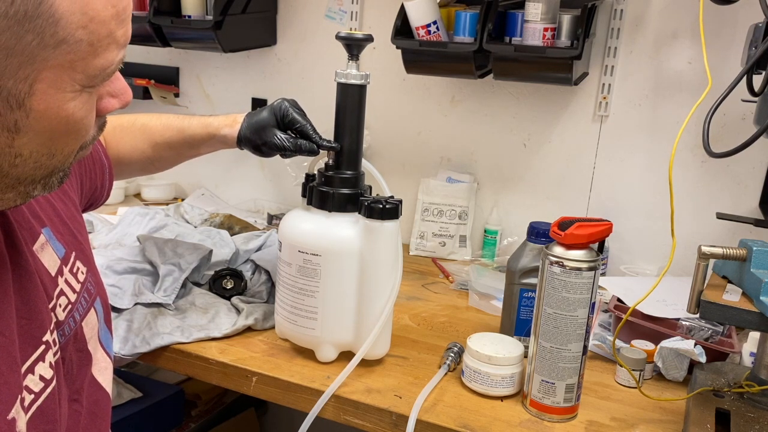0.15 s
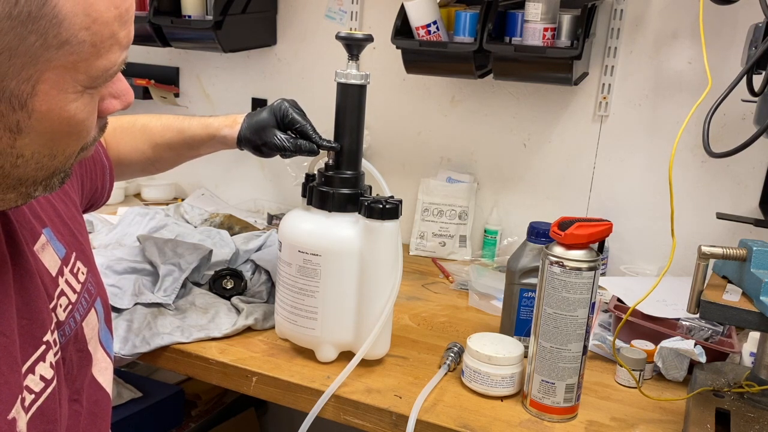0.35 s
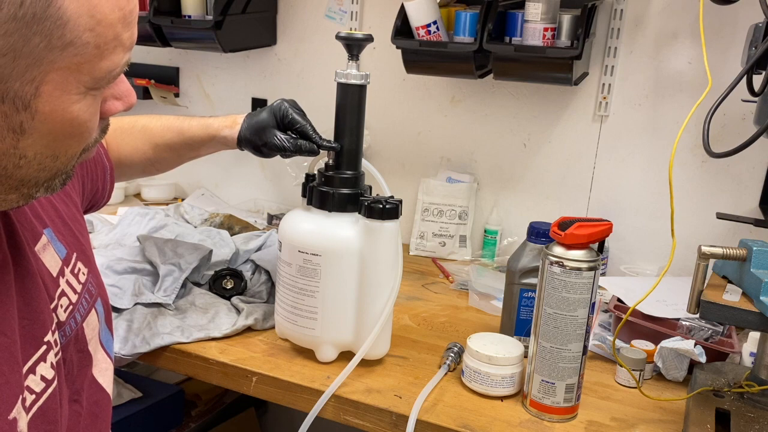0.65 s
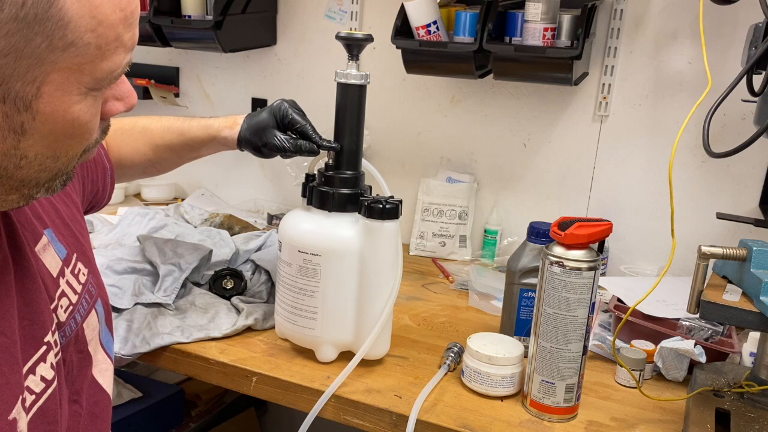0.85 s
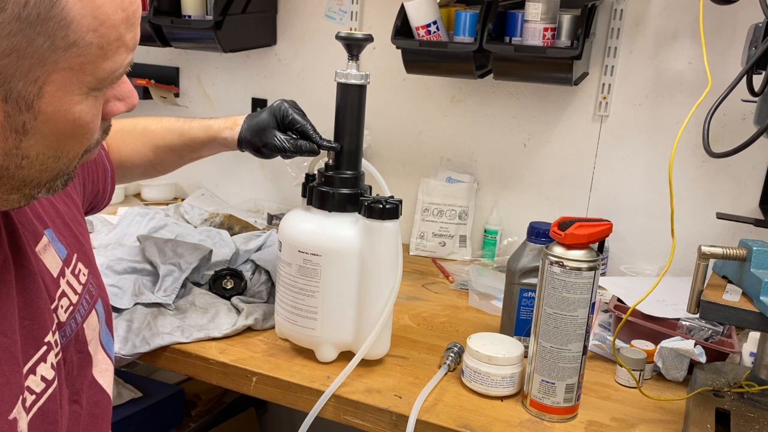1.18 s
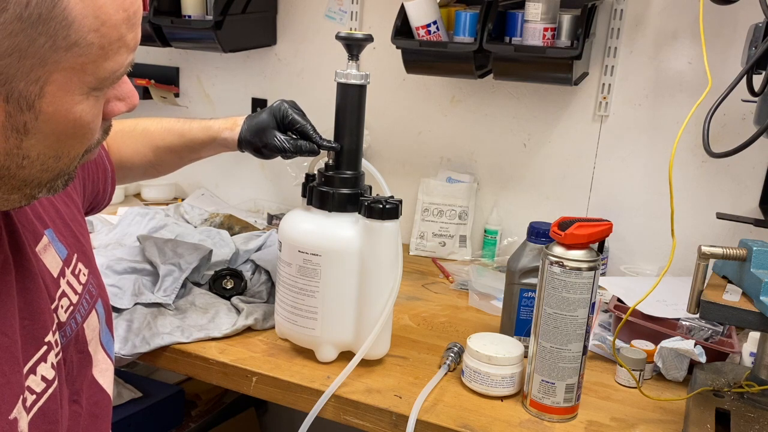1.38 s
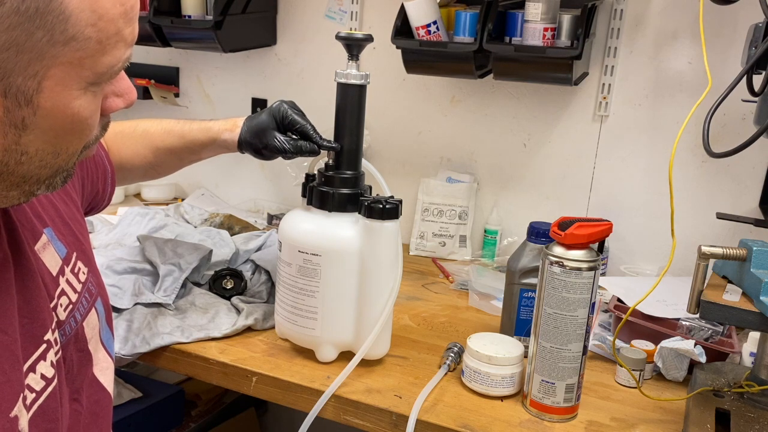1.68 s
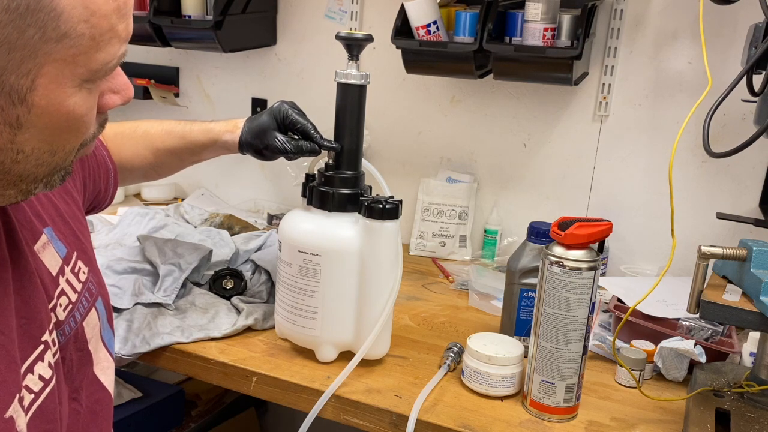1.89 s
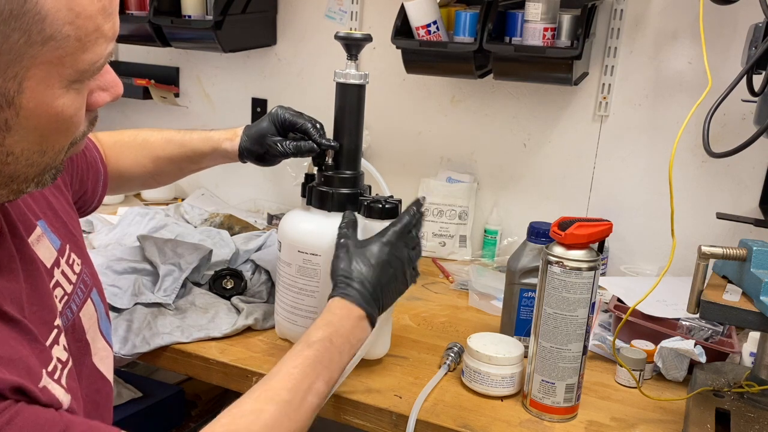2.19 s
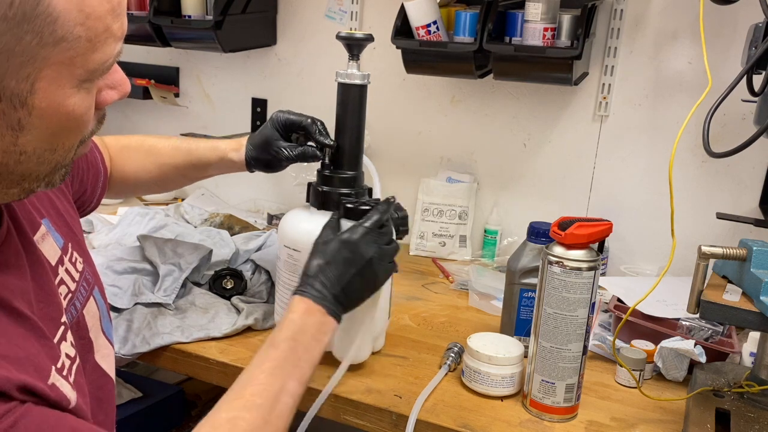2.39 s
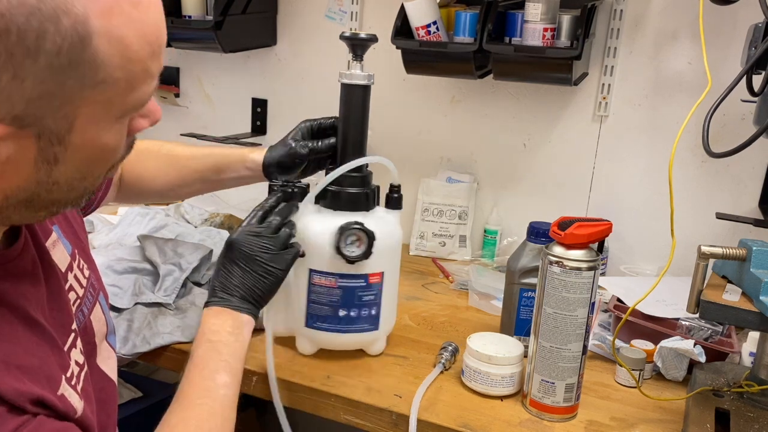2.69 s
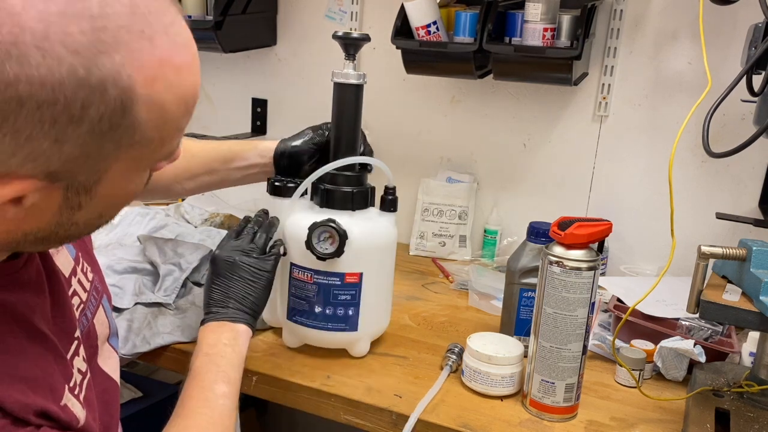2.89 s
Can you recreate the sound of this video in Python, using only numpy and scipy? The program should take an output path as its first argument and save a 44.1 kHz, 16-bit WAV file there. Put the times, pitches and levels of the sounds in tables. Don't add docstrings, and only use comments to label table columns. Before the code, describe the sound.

Bright, steady hiss of air leaving a plastic pressure tank slowly softens; after two seconds faint taps, then hollow knocks and scraping on a wooden bench as the hiss dulls and dies. Small workshop, close stereo microphone.

```python
import sys
import numpy as np
from scipy import signal
from scipy.fft import rfft, irfft, next_fast_len
from scipy.io import wavfile
from scipy.ndimage import uniform_filter1d, map_coordinates

SR = 44100
rng = np.random.default_rng(int(sys.argv[2]) if len(sys.argv) > 2 else 0)


def makeup_ratio(level_db):
    decades = np.asarray(level_db, float) / 20
    return 10 ** decades


def int16_out(signal):
    q = np.round(np.clip(np.atleast_2d(signal).T, -1, 1) * 32767)
    wavfile.write(sys.argv[1], SR, q.astype(np.int16))


N = 134505


def unit(x):
    return x / np.sqrt(np.mean(x ** 2) + 1e-20)


def along(points, hz):
    f, v = np.transpose(points)
    return np.interp(np.log(hz + 1), np.log(f + 1), v)


def curves(rows):
    s, *columns = np.transpose(rows)
    return [np.interp(np.arange(N) / SR, s, column) for column in columns]


def wobble(rate):
    knots = rng.standard_normal(int(N * rate / SR) + 4)
    return map_coordinates(knots, [np.arange(N) * rate / SR])


def filtered(x, response):
    n = np.shape(x)[-1]
    m = next_fast_len(n + 8192)
    return irfft(rfft(x, m) * response(np.fft.rfftfreq(m, 1 / SR)), m)[..., :n]


def peak(f, hz, width):
    return 1j * f * width / (hz * hz - f * f + 1j * f * width)


# frequency in Hz, t60 in seconds.
ROOM_DECAY = [(200, 0.22), (2000, 0.19), (12000, 0.099)]


def room(x):
    hz, t, z = signal.stft(rng.standard_normal((2, SR // 3)), SR, nperseg=256)
    z = z * makeup_ratio(-60 * t / along(ROOM_DECAY, hz)[:, None])
    z = z / np.linalg.norm(z, axis=2, keepdims=True)
    tail = signal.istft(z, SR, nperseg=256)[1]
    delayed = np.pad(x, (150, 0))[None]
    return signal.fftconvolve(delayed, tail / np.linalg.norm(tail[0]), axes=1)[:, :N]


# frequency in Hz, lead of the right port in radians.
PORT_PHASE = [(0, 0.099), (1100, 0.86), (1900, -0.82), (2600, -0.62), (4300, -1.4), (5300, -1.86),
              (6400, -0.9), (7100, 1.4)]
# frequency in Hz, lead of the right port in cycles.
TREBLE_TURNS = [(7900, .3), (8450, .5), (9100, .76), (10050, 1), (11860, 1.5), (13650, 1.93), (14700, 2.05),
                (15700, 2.45)]


def ports(x):
    points = PORT_PHASE + [(hz, 2 * np.pi * cycles) for hz, cycles in TREBLE_TURNS]
    half_lead = lambda f: np.interp(f, *np.transpose(points)) / 2
    return filtered(x, lambda f: np.exp(1j * np.outer([-1, 1], half_lead(f))))


# frequency in Hz, level in dB per Hz.
ROOM_TONE = [(25, -12.5), (60, -4), (130, -15.5), (250, -24.5), (450, -27), (900, -36.5), (3000, -46),
             (7000, -34), (14600, -39), (15200, -62)]
# frequency in Hz, left-right likeness (correlation).
ALIKE = [(60, 0.24), (250, 0.55), (800, 0.83), (4000, 0.19), (7000, .3), (9000, 0.76)]


def floor():
    turn = lambda f: np.arccos(np.clip(along(ALIKE, f), -1, 1)) / 2
    colour = lambda f: makeup_ratio(along(ROOM_TONE, f)) * [np.cos(turn(f)), np.sin(turn(f))]
    mid, side = filtered(rng.standard_normal((2, N)), colour)
    level = makeup_ratio(-64 + 0.4 * wobble(25))
    return ports(level * unit(np.array([mid + side, mid - side])))


# time in seconds, swing frequency in Hz, level in dB.
BOOM = [
    (2.33, 68.26, -61),
    (2.391, 67.4, -29),
    (2.442, 71.2, -38),
    (2.484, 68.6, -27.5),
    (2.598, 69.7, -42.5),
    (2.64, 65, -29.5),
    (2.654, 66.8, -39.5),
    (2.856, 67, -42),
    (2.9, 68.5, -68),
]
# start in seconds, level in dB, frequency in Hz, length in seconds.
SWAYS = [(0.024, -57, 54.2, 0.18), (0.32, -62, 55, 0.11), (0.779, -57.5, 57.8, 0.11),
         (1.405, -74, 61.7, 0.2), (1.759, -55.5, 53.8, 0.19), (2.139, -55.5, 48, 0.11),
         (2.28, -47.5, 50.3, 0.044), (2.947, -53, 58.5, 0.034), (2.497, -49, 42.3, .1),
         (2.743, -44, 44.7, 0.11), (2.76, -51, 163, 0.052), (2.12, -64, 150, 0.039),
         (2.26, -56, 142, 0.029)]


def bench():
    t = np.arange(N) / SR
    drift = 0.48
    before = (BOOM[0][0] - 0.03, BOOM[0][1], -90)
    after = (BOOM[-1][0] + 0.092, BOOM[-1][1], -90)
    hz, db = curves([before, *BOOM, after])
    boom = np.sqrt(2) * makeup_ratio(db) * np.sin(2 * np.pi * np.cumsum(hz) / SR + drift * wobble(29))
    for start, level, f, length in SWAYS:
        u = np.clip((t - start) / length, 0, 9)
        swell = 4.9 * makeup_ratio(level) * u * np.exp(-2 * u * u)
        boom += swell * np.sin(2 * np.pi * f * (t - start) + drift * wobble(38))
    return boom


# frequency in Hz, level in dB per Hz.
CONTACT = [(59, -10), (100, 0), (190, -5), (353, -11), (712, -4.5), (803, -8.5), (3990, -17), (10000, -26),
           (12000, -43.5), (15600, -75), (22000, -120)]
# frequency in Hz, width in Hz, level in dB.
BODY_MODES = [(105, 25, 9.5), (150, 27, 6.5), (181, 33, 11), (425, 46, 5), (730, 24, 4.5), (974, 76, 5),
              (1426, 340, 6.5), (2080, 140, 1.5)]


def body(x, ring=1):
    def colour(f):
        return makeup_ratio(along(CONTACT, f)) * (f > 90)

    def modes(f, wall):
        return sum(makeup_ratio(db) * peak(f, hz, width) for hz, width, db in BODY_MODES if (hz > 300) == wall)

    bench_part = filtered(x, lambda f: colour(f) * (1 + modes(f, False)))
    return bench_part + filtered(x * ring, lambda f: colour(f) * modes(f, True))


# start in seconds, peak in dB, frequency in Hz, t60 in seconds.
PINGS = [(2.101, -59, 960, 0.062), (2.127, -54, 536, 0.076), (2.24, -45, 1535, 0.045),
         (2.3, -53, 705, 0.31), (2.343, -29.5, 1730, 0.028), (2.344, -28.5, 2094, 0.023),
         (2.345, -42, 960, 0.054), (2.376, -34.5, 714, 0.094), (2.399, -35.5, 716, 0.1),
         (2.403, -49, 3500, 0.093), (2.442, -33.5, 733, 0.12), (2.449, -36.5, 732, 0.11),
         (2.475, -38, 1607, 0.087), (2.54, -30.5, 720, 0.094), (2.541, -31, 204, 0.084),
         (2.578, -36, 713, .12), (2.596, -28, 3314, 0.028), (2.596, -28, 3900, 0.026),
         (2.602, -29.5, 705, 0.1), (2.603, -33, 1439, 0.072), (2.603, -29.5, 2092, 0.066),
         (2.541, -33, 2050, .04), (2.102, -52.5, 600, .08), (2.567, -35, 1566, 0.065),
         (2.628, -40, 686, 0.07), (2.652, -41, 1590, 0.064), (2.722, -43, 1570, 0.11),
         (2.74, -45, 1564, 0.072), (2.362, -39.5, 197, 0.17), (2.607, -37, 213, .08), (2.88, -50, 150, 0.1)]


def pings():
    t, out = np.arange(N) / SR, np.zeros(N)
    rise_s, drift = 0.00077, 0.35
    for start, db, hz, t60 in PINGS:
        u = np.clip(t - start, 0, 1)
        envelope = makeup_ratio(db - 60 * u / max(t60, 0.005)) * (1 - np.exp(-u / rise_s))
        out += envelope * np.sin(2 * np.pi * hz * u + drift * wobble(120))
    return out


# time in seconds, peak in dB, centre frequency in Hz, t60 in seconds.
KNOCKS = [(2.098, -49, 760, 0.041), (2.125, -51.5, 530, 0.032), (2.217, -51.5, 700, 0.1),
          (2.11, -53, 516, .08), (2.228, -52, 890, 0.045), (2.24, -43, 1140, 0.033),
          (2.24, -46.5, 525, .06), (2.256, -56, 422, .08), (2.338, -44.5, 430, .04), (2.45, -35, 1020, .06),
          (2.7, -42, 600, 0.13), (2.74, -47, 910, 0.073), (2.27, -55, 515, .05), (2.296, -60, 600, .06),
          (2.316, -44.5, 1490, .05), (2.342, -25.5, 1850, 0.015), (2.343, -38.5, 3420, 0.052),
          (2.4, -44, 1550, .04), (2.435, -38, 960, .04), (2.445, -30.5, 1770, 0.053),
          (2.504, -33, 1400, 0.06), (2.52, -27, 2270, 0.056), (2.54, -30, 1670, 0.03),
          (2.57, -35, 1580, 0.024), (2.595, -24.5, 4930, 0.022), (2.595, -23, 1970, 0.028),
          (2.604, -32, 2120, .03), (2.655, -38, 1550, 0.034), (2.766, -39.5, 490, 0.099),
          (2.803, -46, 634, 0.078), (2.83, -51.5, 330, 0.12), (2.93, -65, 1970, 0.093)]


def knocks():
    out, lead = np.zeros(N + SR), SR // 100
    u = (np.arange(SR // 4) - lead) / SR
    rise_s, hold_s, width = 0.0014, 0.0053, 0.51
    for start, db, hz, t60 in KNOCKS:
        decay = makeup_ratio(-60 * np.clip(u - hold_s, 0, 1) / max(t60, 0.005))
        burst = rng.standard_normal(len(u)) * np.clip(u / rise_s + 0.14, 0, 1) * decay
        crack = filtered(burst, lambda f: peak(f, hz, width * hz) ** 2 + 0.12 * peak(f, 1.66 * hz, 2.7 * hz) ** 2)
        ring = filtered(body(burst), lambda f: f > 300)
        knock = crack / abs(crack).max() + makeup_ratio(-6.5) * ring / abs(ring).max()
        out[round(start * SR) - lead:][:len(u)] += makeup_ratio(db - 2) * knock
    return filtered(out[:N], lambda f: (1 + 1j * f / 6500) ** -2)


def rustle():
    cloth = unit(filtered(rng.standard_normal(N), lambda f: peak(f, 850, 2500) ** 2))
    centre_s, length_s = 1.91, 0.048
    return makeup_ratio(-61.5) * cloth * np.exp(-((np.arange(N) / SR - centre_s) / length_s) ** 2)


# time in seconds, drag force in dB, wall ring in dB.
PULL = [
    (2.21, -69.5, -14),
    (2.33, -54, -3),
    (2.361, -45.5, -5),
    (2.431, -45.5, -7),
    (2.531, -40, -4),
    (2.61, -39.5, 2),
    (2.679, -47, -7),
    (2.779, -46, -8.5),
    (2.87, -77, -2),
]


def drag():
    before = (PULL[0][0] - 0.03, -100, 0)
    after = (PULL[-1][0] + 0.026, -100, 0)
    force_db, ring_db = curves([before, *PULL, after])
    slips_per_s, slip_db, rub_db = 990, 5.5, 2
    slips = (rng.random(N) < slips_per_s / SR) * makeup_ratio(slip_db * rng.exponential(size=N))
    slips = slips * rng.choice([-1, 1], N)
    push = unit(slips) + makeup_ratio(rub_db) * rng.standard_normal(N)
    norm = np.std(filtered(body(push), lambda f: (f > 400) & (f < 2500)))
    return body(push * makeup_ratio(force_db + 1 + 2.26 * wobble(45)), makeup_ratio(ring_db)) / norm


# frequency in Hz, left over right in dB.
TANK_LEFT = [(150, -3), (380, -2), (700, 3), (1300, -0.2), (2400, 1.3), (4400, 4)]


def moved_tank():
    moved = drag() + knocks() + rustle() + pings()
    wet = filtered(room(moved), lambda f: makeup_ratio(-0.5) * 1j * f / (800 + 1j * f) / (1 + (f / 7000) ** 4))
    apart = lambda f: makeup_ratio(-3) * abs(peak(f, 1270, 800))
    near = filtered(moved, lambda f: (f < 7000) * (1 + np.outer([1j, -1j], apart(f))))
    near = near + ports(filtered(moved, lambda f: f >= 7000))
    return filtered(near + wet, lambda f: makeup_ratio(np.outer([1, -1], along(TANK_LEFT, f)) / 2))


# time in seconds, outflow in dB, shading by the tank in dB.
OUTFLOW = [(0, -43.5, 0), (.6, -44, -1), (1.3, -46.5, -0.5), (2.1, -49.5, 1), (2.31, -51, 0),
           (2.37, -49.5, -3.5), (2.405, -51.5, -9.5), (2.45, -49, -11), (2.53, -48, -6), (2.59, -48.5, -11),
           (2.69, -50.5, -11), (2.75, -54, -11.5), (2.82, -59, -11), (2.88, -74, -3), (2.92, -70.5, -2),
           (2.94, -62.5, -6), (2.97, -73.5, -4), (3.05, -68, -6)]
# frequency in Hz, level in dB per Hz.
JET_TONE = [(500, -34.5), (1100, -22.5), (1500, -12.5), (4000, -7.5), (7000, -6.5), (10000, 2.5),
            (14300, -1), (15600, -13.5)]
# frequency in Hz, share of the shading.
SHADE = [(3000, 0.037), (9000, 0.11), (12000, 1.5), (14500, 1.6), (15200, 2.2)]


def turbulence():
    level_db, shade_db = curves(OUTFLOW)
    hz, t, z = signal.stft(rng.standard_normal(N), SR, nperseg=512)
    at_frames = lambda curve: np.interp(t, np.arange(N) / SR, curve)
    patches = uniform_filter1d(rng.standard_normal(z.shape), size=6, axis=0)
    patches = unit(uniform_filter1d(patches, size=10, axis=1))
    shade = along(SHADE, hz)[:, None] * at_frames(shade_db)
    shade = shade + np.outer(hz > 14740, 4.2 * at_frames(wobble(13)))
    tone_db = along(JET_TONE, hz)
    scale = np.sqrt(np.mean(makeup_ratio(2 * tone_db)))
    air = signal.istft(z * makeup_ratio(tone_db[:, None] + 0.93 * patches + shade), SR, nperseg=512)[1][:N]
    return air / scale * makeup_ratio(level_db + 3.0 - 0.16 * wobble(4.4) + 0.62 * wobble(28.07))


# frequency in Hz, level of each copy in dB.
COPIES = [(2000, -20.5), (7000, -27), (11000, -10.5), (13000, -5.5)]
# frequency in Hz, level in dB.
WET = [(300, -1), (1400, -6.5), (3000, -4.5), (5200, 1), (6800, -4), (8000, -2.5), (9600, -16.5)]
# frequency in Hz, left over right in dB.
JET_LEFT = [(300, 4), (1000, 3.5), (1700, 0), (5000, 4), (7500, 2), (8600, -0.3)]
# frequency in Hz, width in Hz, level in dB.
VALVE = [(1400, 190, 3), (1850, 200, -3.5), (2087, 112, 4.5), (2790, 62, -2.5), (3460, 65, 2),
         (4376, 117, -5), (5400, 160, 2.5), (5820, 98, 2), (5980, 110, -3), (7470, 190, 2), (7830, 170, -4),
         (13300, 170, 2)]


def jet():
    lag_s, sign = 0.01 * rng.random(8), rng.choice([-1, 1], 8)
    echoes = lambda f: (sign * np.exp(-2j * np.pi * np.outer(f, lag_s))).sum(axis=1)
    air = filtered(turbulence(), lambda f: 1 + makeup_ratio(along(COPIES, f)) * echoes(f))
    wet = filtered(room(air), lambda f: makeup_ratio(along(WET, f)))
    cavities_db = lambda f: sum(db * np.exp(-((f - hz) / width) ** 2) for hz, width, db in VALVE)
    return filtered(ports(air) + wet, lambda f: makeup_ratio(np.outer([1, -1], along(JET_LEFT, f)) / 2 + cavities_db(f)))


def scene():
    boom = bench() * makeup_ratio([[-0.9], [0.9]])
    return floor() + boom + moved_tank() + jet()


def top_cut(x):
    return signal.sosfilt(signal.butter(12, 16060, fs=SR, output="sos"), x)


def record(dry):
    mix = filtered(dry, lambda f: f < 15800)
    return top_cut(mix)


dry = scene()
out = record(dry)
int16_out(out)
```